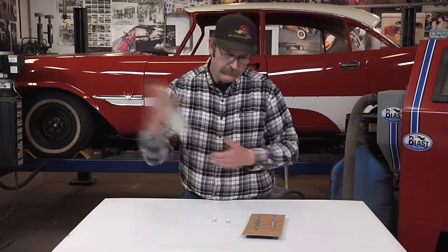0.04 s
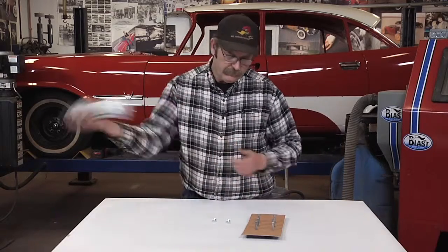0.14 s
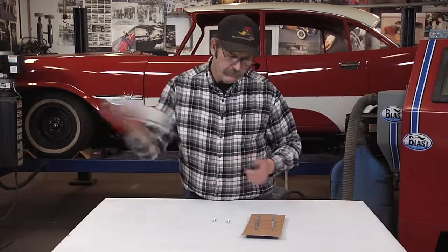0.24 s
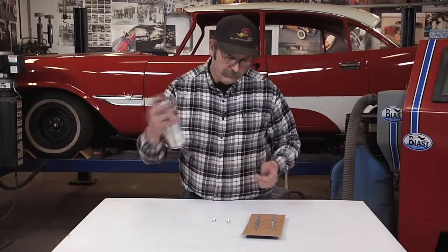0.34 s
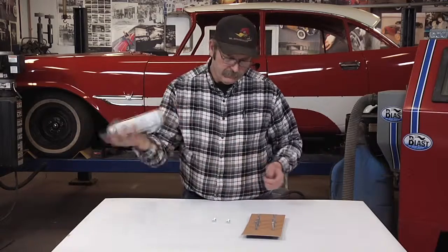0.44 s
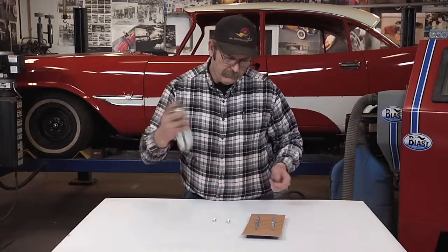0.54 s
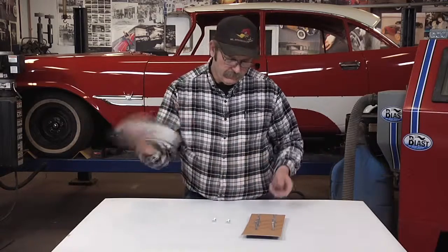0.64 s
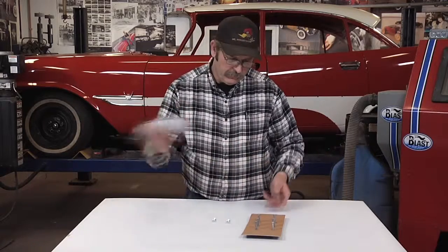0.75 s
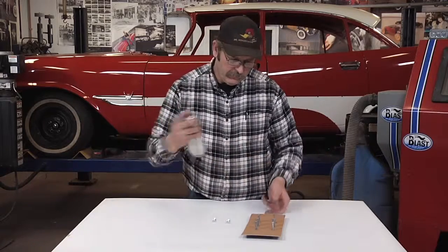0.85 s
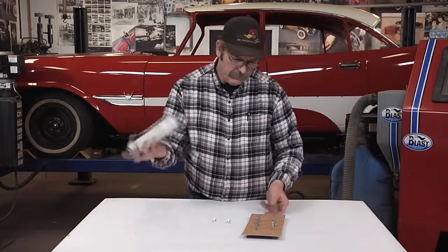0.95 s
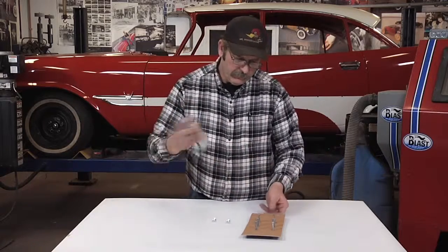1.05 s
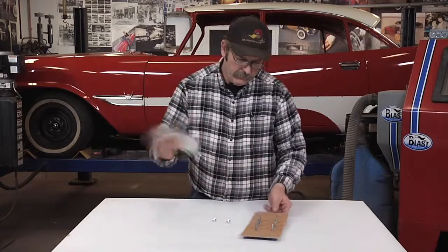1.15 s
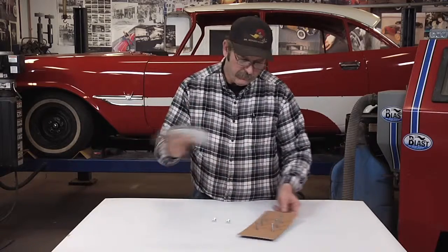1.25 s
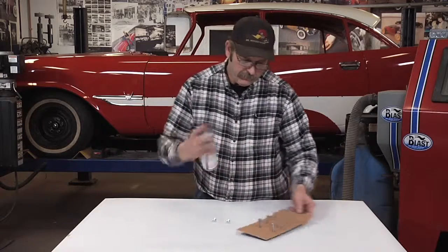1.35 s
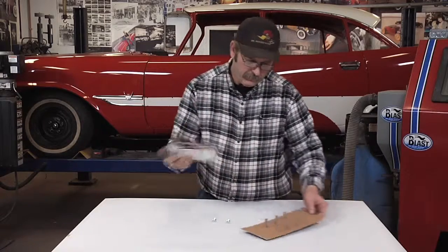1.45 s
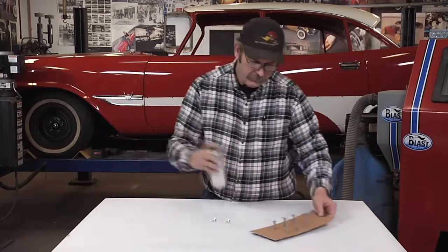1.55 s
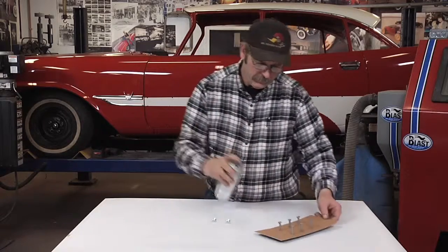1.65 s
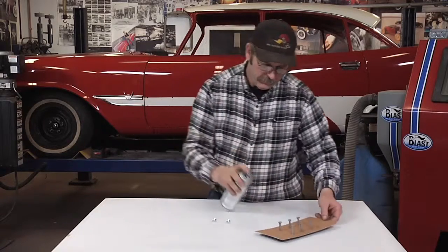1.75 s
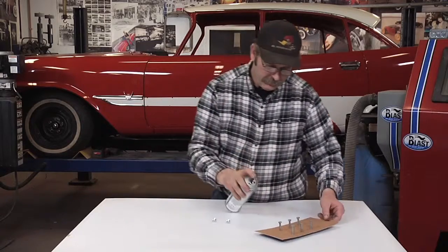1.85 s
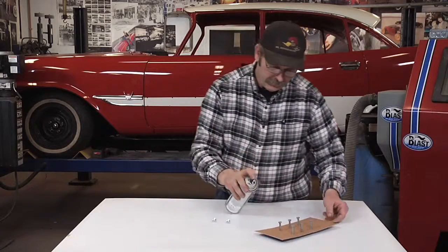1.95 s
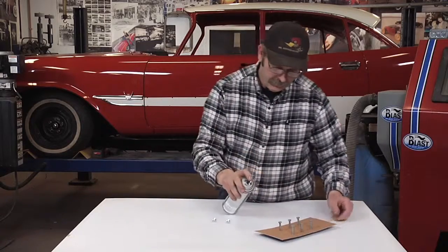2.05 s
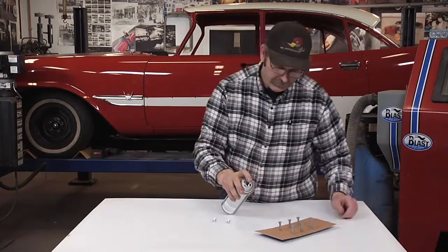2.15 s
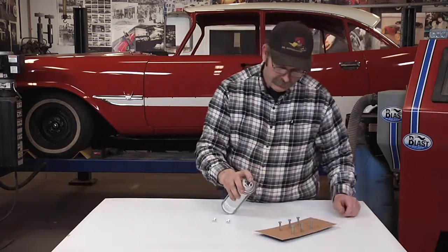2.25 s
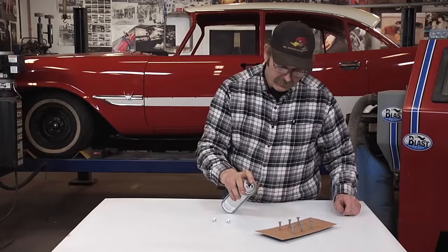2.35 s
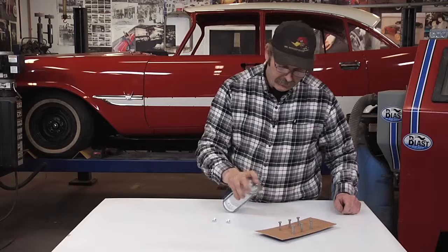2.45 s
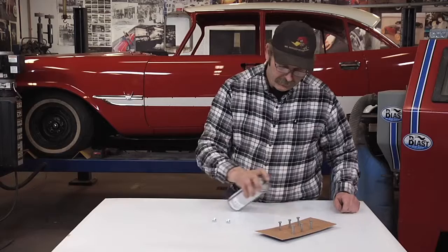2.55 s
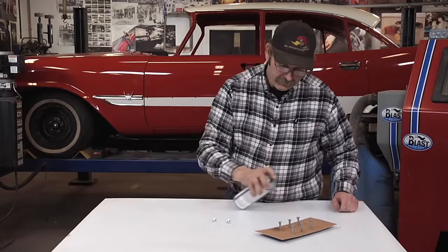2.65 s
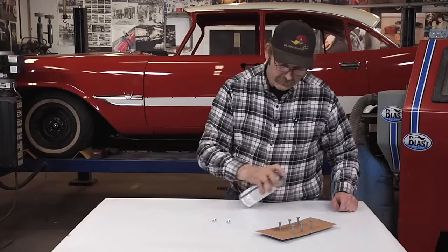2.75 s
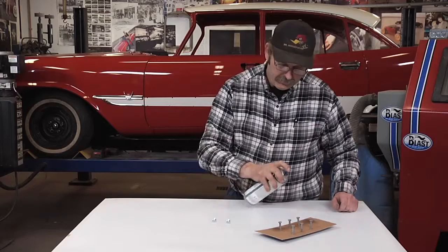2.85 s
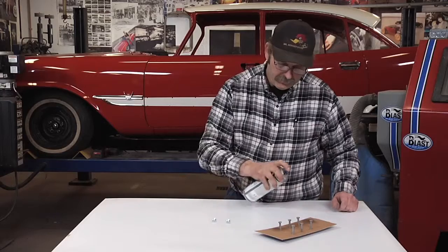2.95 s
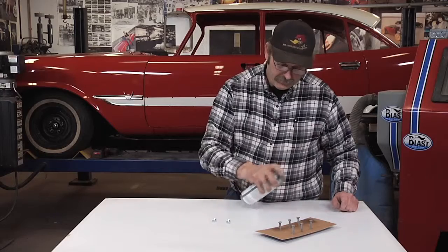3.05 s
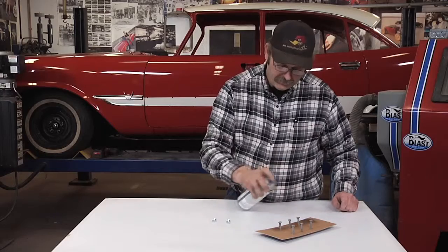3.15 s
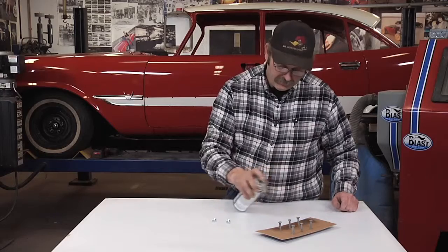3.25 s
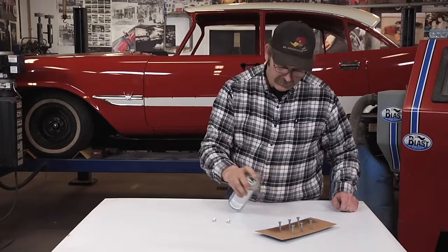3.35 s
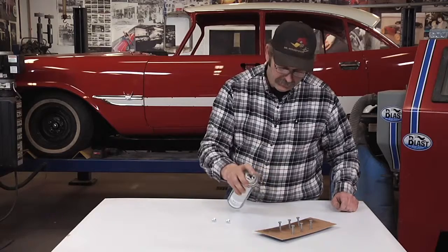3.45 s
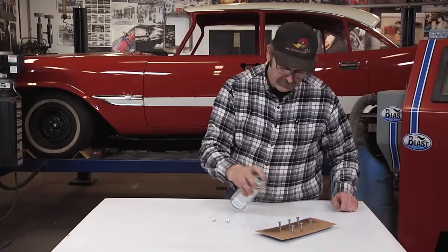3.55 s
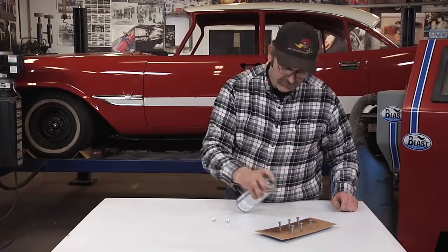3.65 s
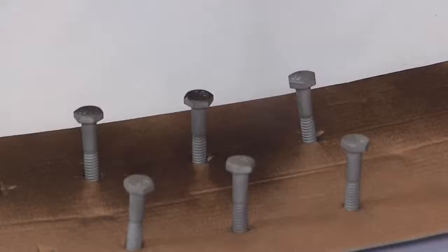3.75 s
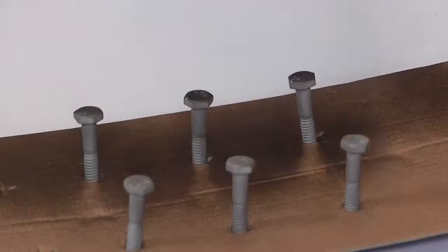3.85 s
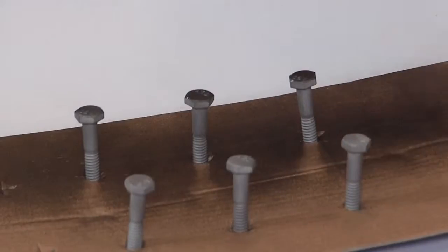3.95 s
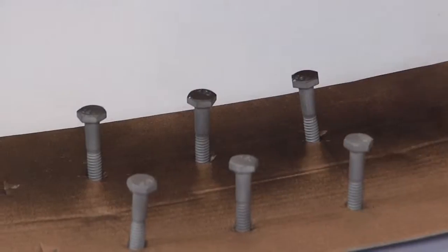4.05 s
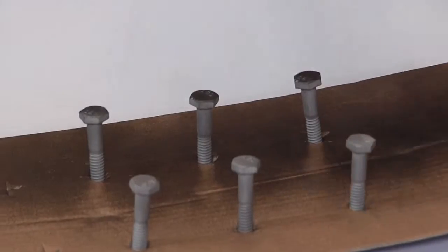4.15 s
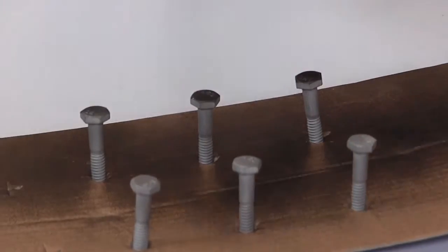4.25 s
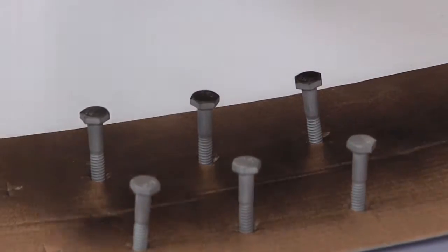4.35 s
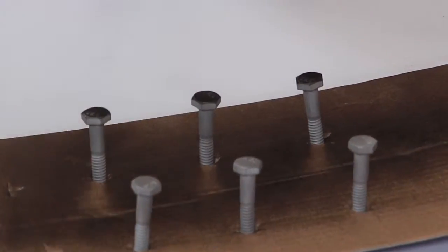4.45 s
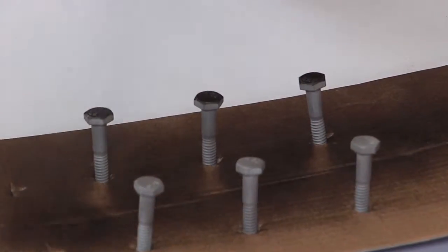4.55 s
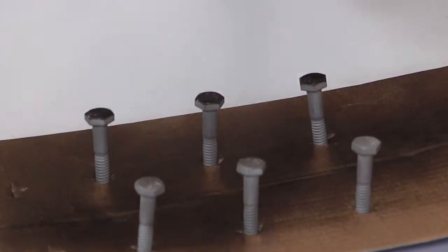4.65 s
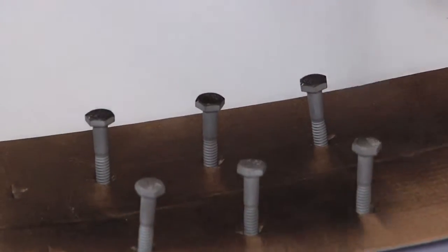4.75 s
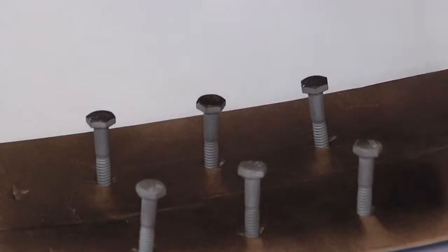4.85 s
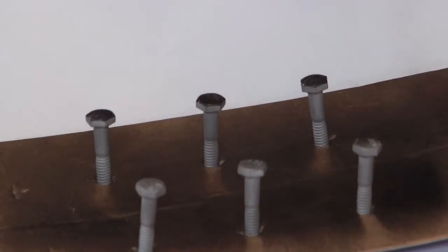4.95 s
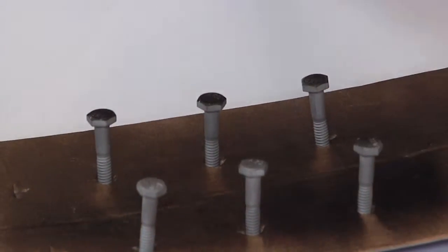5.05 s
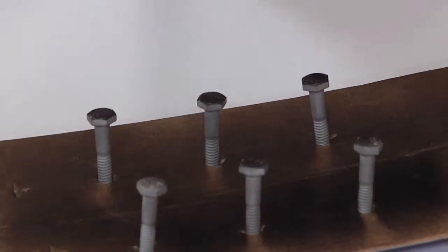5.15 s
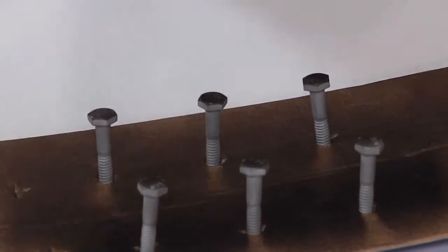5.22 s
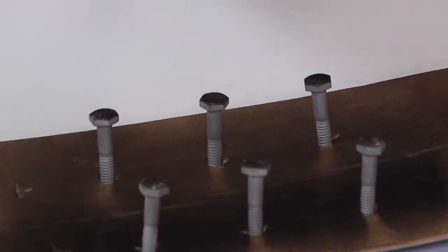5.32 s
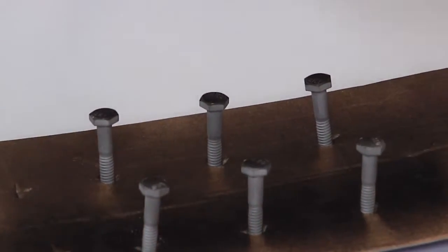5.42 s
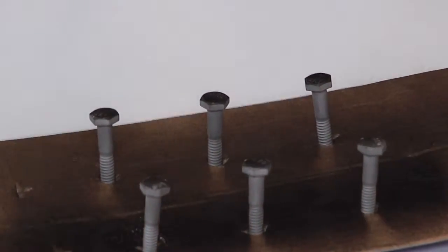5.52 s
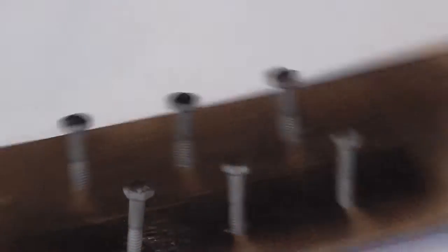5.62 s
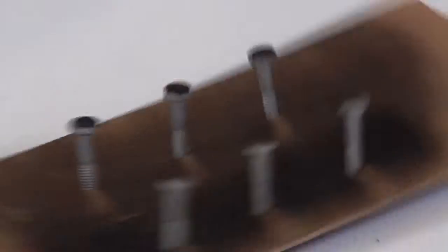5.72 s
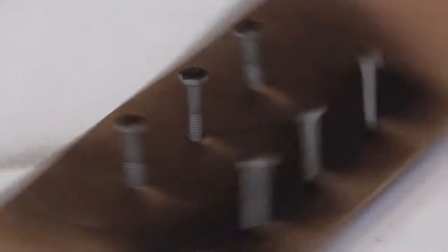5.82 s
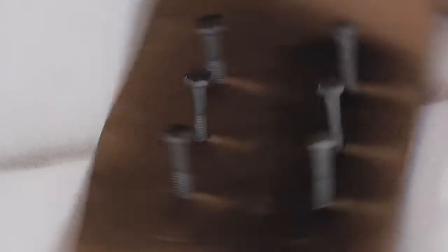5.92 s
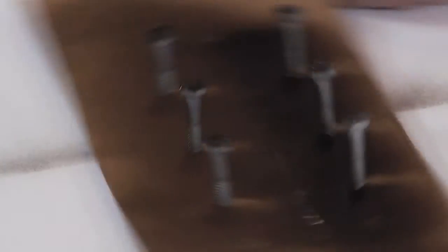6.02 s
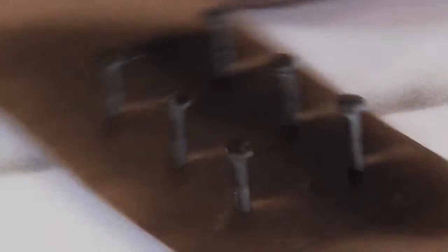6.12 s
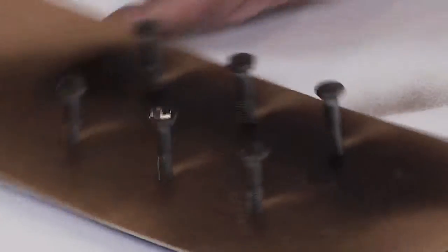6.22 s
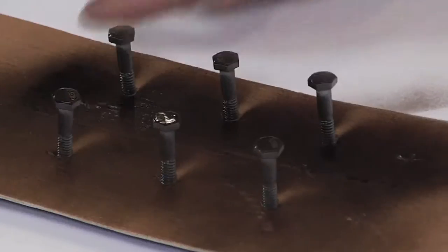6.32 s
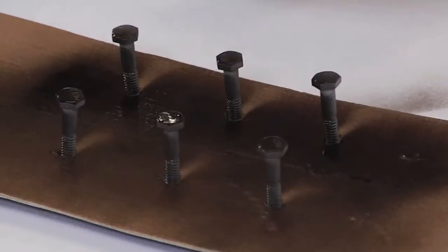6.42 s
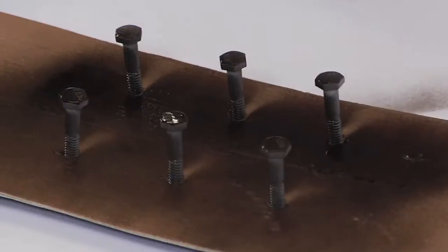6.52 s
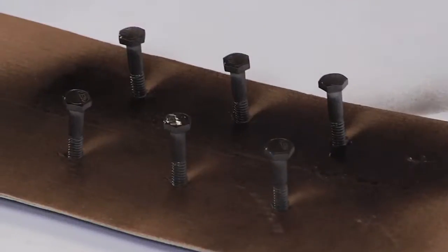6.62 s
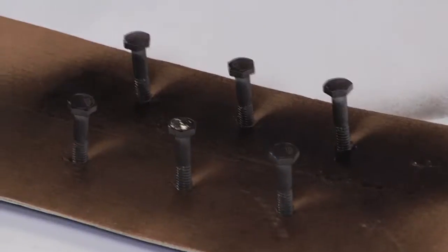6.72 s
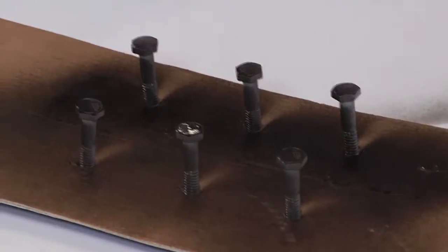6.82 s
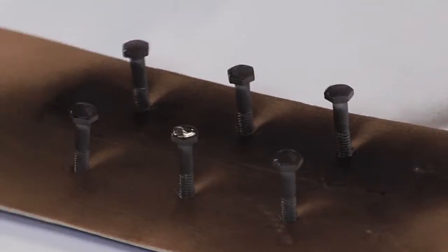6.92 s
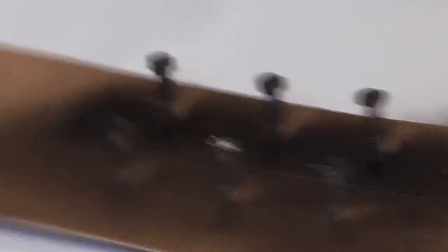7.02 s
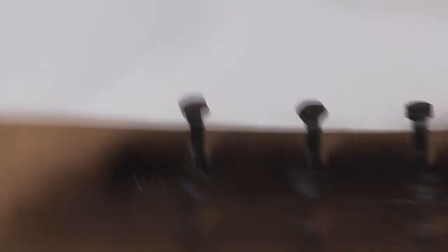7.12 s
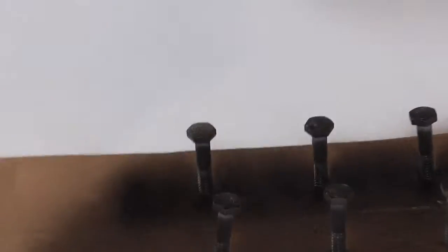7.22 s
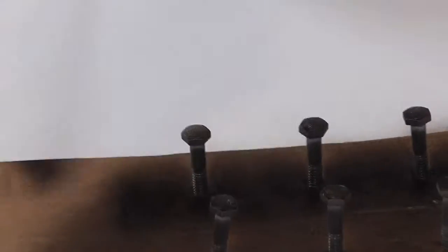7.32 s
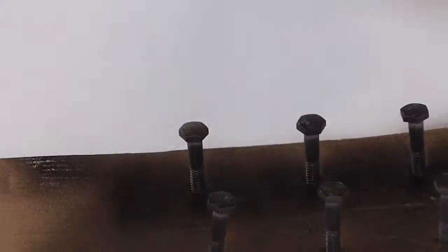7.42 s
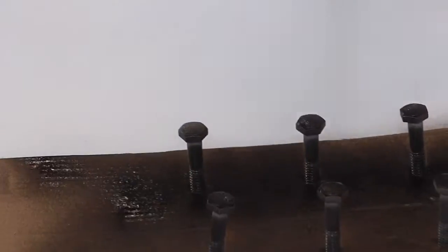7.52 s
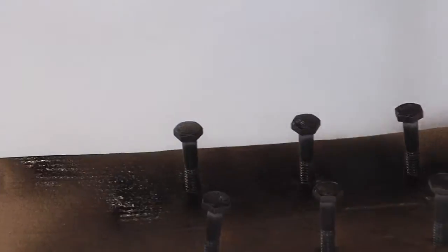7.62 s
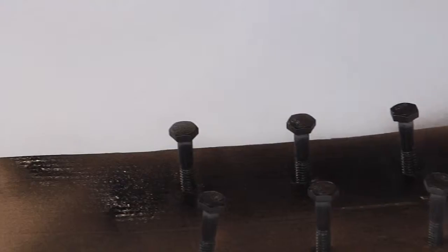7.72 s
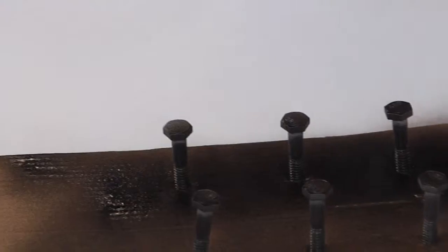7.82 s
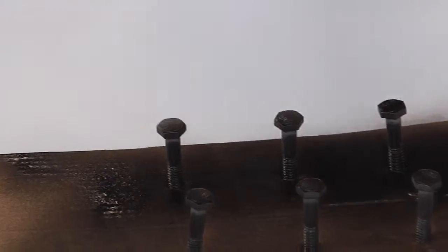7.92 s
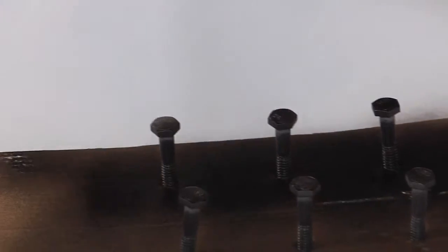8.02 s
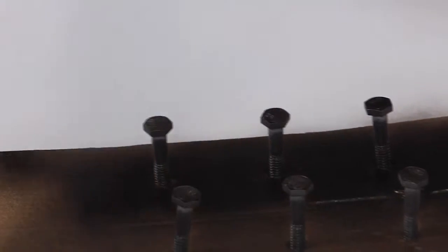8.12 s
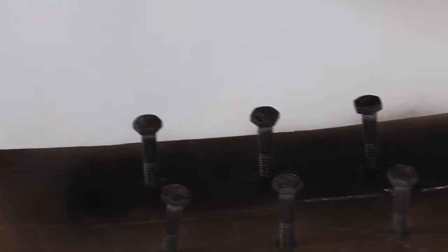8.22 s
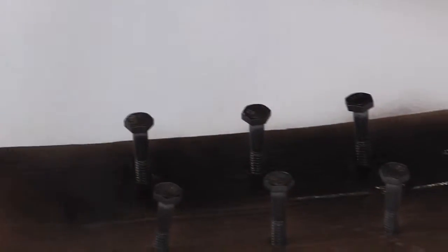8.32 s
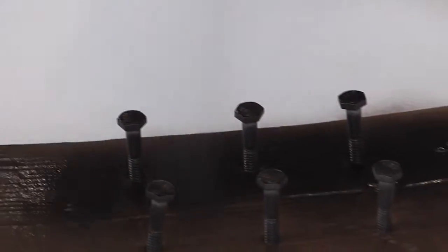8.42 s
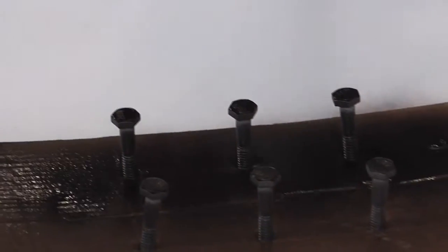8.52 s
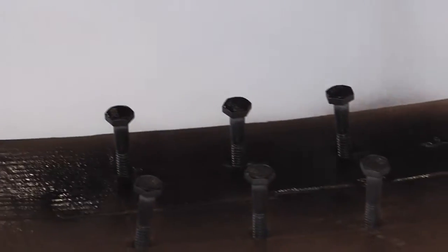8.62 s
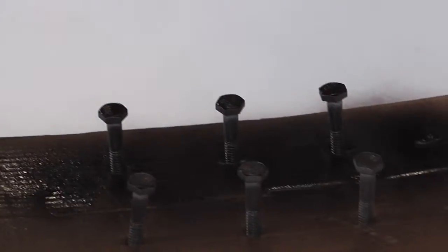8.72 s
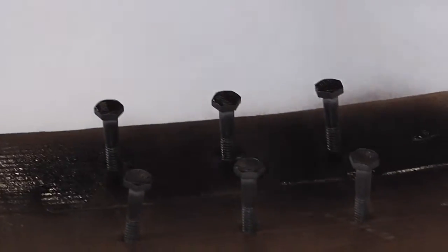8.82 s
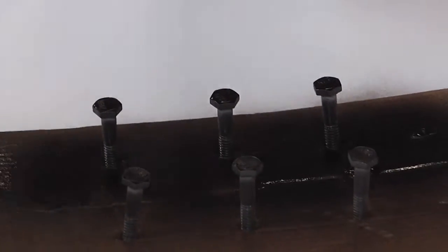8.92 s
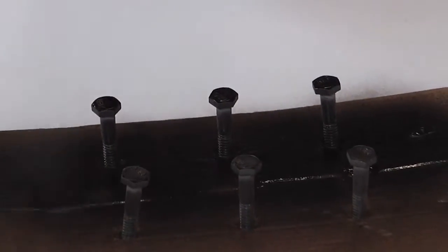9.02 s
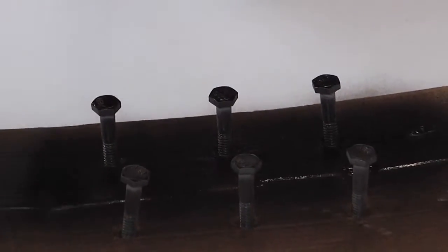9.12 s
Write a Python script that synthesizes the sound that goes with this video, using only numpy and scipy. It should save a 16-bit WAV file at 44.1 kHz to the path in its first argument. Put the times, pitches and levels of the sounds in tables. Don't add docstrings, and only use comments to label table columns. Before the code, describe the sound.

Rapid metallic rattling of a paint can gives way to six short sprays, a dragged cardboard sheet with table knocks, then four more sprays.

```python
import sys
import numpy as np
from scipy import signal
from scipy.io import wavfile
from scipy.ndimage import uniform_filter1d

SR = 44100
rng = np.random.default_rng(int(sys.argv[2]) if len(sys.argv) > 2 else 0)


def how_loud(loudness_db):
    steps = np.asarray(loudness_db, float) / 20
    return 10 ** steps


def to_wav(s):
    ch = np.atleast_2d(s).T
    pcm = np.round(np.clip(ch, -1, 1) * 32767)
    wavfile.write(sys.argv[1], SR, pcm.astype(np.int16))


N = 404397
TIME = np.arange(N) / SR

# frequency in Hz, density in dB per Hz.
AIR_SPECTRUM = [(15, -48), (25, 1), (117, -3.5), (200, -9.5), (277, -10.5), (659, -19), (754, -18.5),
                (1190, -27), (3000, -30.5), (16000, -40)]
# time in seconds, low brush in dB, dry rustle in dB.
SLEEVE_RUBS = [
    [(0.0, -67, -56.5), (0.242, -77, -75.5), (0.27, -89, -75)],
    [(1.95, -70, -65), (2.58, -72, -71), (2.64, -79, -64)],
]
# time in seconds, level in dB, high mode in Hz,
# low mode in dB below, crack in dB below.
TOP_HITS = [(0.3425, -17, 2840, -11, -6.5), (0.3582, -28, 2460, -5, -5.5), (0.4101, -32.5, 4940, -5, -10.5),
            (0.4198, -37, 4700, -5.5, 1), (0.6228, -15.5, 4570, -13, -21), (0.6291, -26.5, 2880, -5, 0),
            (0.6652, -21.5, 4380, -20, -15), (0.8557, -20.5, 4080, -12, -7),
            (0.8647, -24.5, 4070, 1.5, -29.5), (0.8745, -29, 4530, -6, 1),
            (0.882, -34.5, 2340, -2.5, -11.5), (1.1186, -13.5, 2580, -8, -4), (1.1329, -22.5, 2650, -3, -3),
            (1.1547, -22.5, 2460, -11.5, -3.5), (1.1796, -26, 2600, -11, -5.5),
            (1.3548, -21.5, 2780, -11, -8), (1.3654, -20.5, 4250, -4, -11), (1.378, -30.5, 2750, -4.5, -22),
            (1.391, -30, 3850, -1, -29), (1.6128, -15.5, 4160, -14, -28), (1.63, -22, 6440, -5.5, -4),
            (1.642, -29, 2770, -0.5, -22.5), (1.6485, -39.5, 3940, -6, 4), (1.8484, -32, 3770, -7.5, -4)]
# time in seconds, level in dB, low mode in Hz,
# high mode in dB below, crack in dB below.
BASE_HITS = [(0.316, -41.5, 1816, -2.5, -15.5), (0.3362, -33, 1840, -12, -16),
             (0.5275, -28.5, 1980, -6, -7), (0.5932, -36.5, 1630, -5, -6), (0.618, -33.5, 1700, -9.5, -1),
             (0.6718, -28.5, 1910, -10, -3), (0.738, -25.5, 1890, -2, 2), (0.742, -23, 1725, -12.5, -17),
             (0.951, -27.5, 790, -5.5, -15.5), (0.961, -31, 1410, -7, -17), (0.971, -21, 1710, -5.5, -4),
             (1.0077, -34, 1110, -5, -10), (1.089, -26, 1010, -10.5, -14), (1.197, -30.5, 1560, -1.5, -2.5),
             (1.2191, -35.5, 1780, -2, -20), (1.2646, -29, 790, -3.5, 1),
             (1.2752, -30.5, 1520, -6.5, -26.5), (1.3216, -32.5, 800, -7.5, -7.5),
             (1.398, -33.5, 1700, -8.5, 0.5), (1.4725, -25.5, 1660, -3, -2.5),
             (1.5, -30.5, 1480, -5.5, -28), (1.539, -32, 1420, -5.5, -9.5), (1.6711, -34, 1410, -4, -5),
             (1.9902, -42, 1960, -2.5, -1.5)]
# time in seconds, level in dB, low mode in Hz, crack in dB below.
WALL_TAPS = [(0.281, -43.5, 1750, -6), (0.2922, -41, 1740, -9.5), (0.303, -45, 1060, -1),
             (0.5706, -36.5, 1450, -5), (0.6916, -33.5, 890, -8), (0.709, -42, 1720, -17),
             (0.801, -33, 1898, -12.5), (0.8235, -35.5, 990, -15), (1.046, -41, 2020, -10),
             (1.3733, -33, 1930, -3), (1.4302, -33, 950, -13), (1.4394, -34.5, 805, -11),
             (1.45, -33, 1300, -12), (1.572, -37, 1240, -28), (1.5985, -33, 1180, -8),
             (1.6078, -39, 1420, -7), (1.6577, -31.5, 1537, -18), (1.682, -35.5, 910, -24),
             (1.6883, -41, 1300, -16), (1.709, -43, 1280, -9), (1.719, -47, 820, -6),
             (1.8509, -28, 1320, -13), (1.9258, -30, 1340, -50), (1.951, -31, 1510, -13.5),
             (2.0095, -38.5, 1510, -21), (2.07, -42, 1380, -15), (2.112, -48.5, 1540, -13),
             (2.134, -48.5, 1600, -16), (2.149, -52, 1570, -7), (2.227, -57, 1410, -8),
             (1.352, -39, 1820, 0), (.382, -46, 710, -20), (0.8306, -40, 950, -18), (2.059, -50, 1900, -12),
             (.6325, -30.5, 1900, 5.5), (.968, -41, 1180, -10), (1.4453, -37, 800, -7),
             (1.143, -35, 2190, -3)]
# other main mode in Hz, low
# neighbour in Hz and dB, high neighbour in Hz and dB.
TOP_MODES = [(1700.0, 1290.0, -4.0, 5200.0, -2.0), (1780.0, 2070.0, -3.0, 5250.0, -2.0),
             (2010.0, 1560.0, -7.0, 4520.0, -2.0), (1710.0, 2110.0, -3.0, 5040.0, 0.0),
             (1910.0, 1290.0, 0.0, 5150.0, -6.0), (1980.0, 1720.0, -2.0, 2530.0, 2.0),
             (2230.0, 1830.0, -5.0, 2840.0, -1.0), (2060.0, 1790.0, -4.0, 3040.0, -8.0),
             (1950.0, 2230.0, -14.0, 4480.0, 3.0), (1790.0, 2120.0, -7.0, 3070.0, -2.0),
             (1830.0, 1220.0, -7.0, 4220.0, 3.0), (2150.0, 1200.0, -4.0, 3330.0, -5.0),
             (1920.0, 1500.0, -3.0, 3390.0, -1.0), (2080.0, 1580.0, -10.0, 3350.0, -8.0),
             (1990.0, 1540.0, -6.0, 6850.0, -7.0), (1880.0, 1390.0, -4.0, 3870.0, -1.0),
             (1850.0, 830.0, -15.0, 4720.0, -4.0), (1950.0, 1670.0, -7.0, 3230.0, -2.0),
             (1950.0, 1480.0, -10.0, 5210.0, 1.0), (1900.0, 1410.0, 0.0, 2660.0, -7.0),
             (1410.0, 1770.0, -2.0, 2710.0, 3.0), (2060.0, 1710.0, -2.0, 2970.0, -5.0),
             (1850.0, 1520.0, 0.0, 2640.0, 2.0), (1640.0, 700.0, 0.0, 2800.0, 0.0)]
BASE_MODES = [(4890.0, 1030.0, -10.0, 5210.0, -3.0), (4940.0, 1010.0, -12.0, 2600.0, -2.0),
              (4270.0, 1510.0, -14.0, 2320.0, -1.0), (3500.0, 1080.0, 1.0, 4110.0, -2.0),
              (2410.0, 1210.0, -6.0, 3380.0, -5.0), (2400.0, 1010.0, -7.0, 3820.0, 0.0),
              (2390.0, 1020.0, -7.0, 3300.0, -3.0), (2290.0, 1000.0, -15.0, 5140.0, -2.0),
              (2840.0, 1270.0, -4.0, 4950.0, -3.0), (4830.0, 860.0, -2.0, 4290.0, -4.0),
              (2470.0, 850.0, -12.0, 5770.0, -3.0), (5020.0, 1780.0, -3.0, 4500.0, 0.0),
              (3370.0, 2050.0, -5.0, 2480.0, -1.0), (2640.0, 2210.0, -4.0, 3900.0, -2.0),
              (2930.0, 740.0, -1.0, 4900.0, -1.0), (2350.0, 1650.0, 0.0, 5460.0, -7.0),
              (2400.0, 2100.0, 3.0, 5170.0, -8.0), (2700.0, 1510.0, -1.0, 3400.0, -7.0),
              (4030.0, 2140.0, -7.0, 5220.0, -1.0), (2320.0, 1210.0, -2.0, 2730.0, -4.0),
              (2850.0, 1990.0, -4.0, 2540.0, -7.0), (2460.0, 2150.0, -7.0, 4710.0, -9.0),
              (4750.0, 1000.0, -6.0, 5710.0, -3.0), (3560.0, 1630.0, -1.0, 3880.0, -2.0)]
WALL_MODES = [(2820.0, 1200.0, -7.0, 5190.0, 0.0), (4940.0, 660.0, -20.0, 7790.0, 0.0),
              (7680.0, 1810.0, 3.0, 7270.0, -2.0), (3310.0, 2010.0, 0.0, 4900.0, -1.0),
              (2900.0, 1950.0, -6.0, 4040.0, -3.0), (2770.0, 640.0, -1.0, 5250.0, -3.0),
              (2890.0, 1270.0, -9.0, 3450.0, -2.0), (3100.0, 2050.0, -7.0, 3620.0, -1.0),
              (2630.0, 1520.0, -4.0, 2990.0, -2.0), (4510.0, 760.0, -9.0, 3770.0, 0.0),
              (3800.0, 1960.0, -3.0, 5160.0, -3.0), (2520.0, 1710.0, 0.0, 4610.0, -6.0),
              (2630.0, 1600.0, -8.0, 2270.0, -2.0), (2410.0, 1680.0, -9.0, 3830.0, -6.0),
              (5100.0, 1600.0, -9.0, 4770.0, -4.0), (3970.0, 840.0, -15, 2330.0, -1.0),
              (4440.0, 960.0, -14.0, 2330.0, -1.0), (2720.0, 1640.0, -3.0, 4710.0, -1.0),
              (2780.0, 980.0, 1.0, 2330.0, -1.0), (2300.0, 1840.0, -4.0, 4030.0, -1.0),
              (2690.0, 1500.0, 3.0, 4210.0, -2.0), (2310.0, 1870.0, -12.0, 3370.0, 0.0),
              (2380.0, 1120.0, -2.0, 3420.0, -2.0), (2470.0, 1210.0, -8.0, 6000.0, -7.0),
              (5020.0, 1800.0, -2.0, 2300.0, -2.0), (3820.0, 2050.0, -7.0, 5040.0, -2.0),
              (3610.0, 1150.0, -1.0, 5610.0, -6.0), (2390.0, 1270.0, -4.0, 3490.0, -1.0),
              (3410.0, 1910.0, -7.0, 2330.0, -3.0), (3900.0, 610.0, -10.0, 6780.0, -1.0),
              (2977, 2100, 2, 4100, -2.5), (2600, 770, -7, 3400, 0.5), (2600, 1300, -8, 3600, -6),
                   (3500, 1500, -3, 5000, -3), (3170, 1500, -2.5, 6300, 7.5), (2424, 850, -1.5, 4500, -0.5),
                   (2400, 1500, 5.5, 4800, -3.5), (3000, 1300, -3.5, 3300, -8)]
SWELL_S = (0.00049, 0.0006, 0.00076)
# time in seconds, gurgle peak in dB, splash in dB above.
SURGES = [(0.3, -65, -8), (0.39, -39.5, 5), (0.57, -43.5, -9), (0.65, -42, 4.5), (0.8, -48, 6.5),
          (0.9, -42.5, 6.5), (1.02, -49.5, -13), (1.165, -40.5, 5), (1.3, -41, -11), (1.42, -41, -5.5),
          (1.531, -43, -10.5), (1.68, -46.5, 8), (1.88, -57, 1), (2.08, -58, -9)]
# valve opens in seconds, valve half shut in seconds, jet in dB,
# extra echo delay in ms at opening, the same at shutting.
SPURTS = [
    (2.6373, 2.986, -45.5, -.062, .095),
    (3.1097, 3.545, -46, .135, .022),
    (3.6289, 4.071, -46.5, .055, .045),
    (4.1609, 4.547, -47.5, .075, .017),
    (4.6074, 4.982, -47.5, .012, .009),
    (5.0718, 5.439, -47, .05, .035),
    (7.3768, 7.86, -46, -.032, .085),
    (7.917, 8.329, -46, .08, .033),
    (8.4001, 8.799, -46, .045, .002),
    (8.8786, 9.2, -47, .04, -.012),
]
# frequency in Hz, density in dB per Hz.
JET_SPECTRUM = [(180, -36), (300, -13.5), (911, -7), (1190, -5), (1830, -2), (2050, -9), (2340, -6.5),
                (2700, -6.5), (3490, -4.5), (7350, -2.5), (8970, 5), (11500, 0), (15000, 4.5), (16000, -4)]
# delays in ms from table, sheet, can, chest.
ECHOES_MS = [(.59, .273, .735, .405), (.532, .63, .495, .19), (.526, .803, .21, .62),
             (.505, .613, .4, .295), (.497, .598, .225, .383), (.463, .565, .396, .625),
             (.485, .588, .29, .39), (.546, .376, .704, .484), (.556, .37, .565, .225),
             (.518, .627, .395, .3)]
ECHO_SHARES = [(-0.25, -0.15, -0.13, -0.12), (-0.17, 0.16, 0.18, 0.18), (-0.21, -0.14, 0.17, 0.15),
               (-0.24, 0.21, -0.18, -0.14), (-0.32, 0.17, 0.18, -0.21), (-0.25, 0.18, -0.17, -0.13),
               (-0.23, 0.15, -0.16, -0.18), (-0.24, -0.22, -0.15, -0.14), (-0.49, -0.18, 0.4, 0.17),
               (-0.35, 0.17, -0.22, -0.17)]
# time in seconds, peak in dB.
SPUTTERS = [(3.12, -54), (4.172, -57), (4.91, -52.5), (5.083, -58)]
# time in seconds, peak in dB, slap in Hz, table boom in dB above.
KNOCKS = [
    (3.8472, -37, 1050, 0),
    (4.831, -52, 330, 0),
    (6.607, -53, 400, 2),
    (6.631, -54, 400, 0),
    (6.7275, -50, 1450, -25),
    (6.729, -53, 1130, -25),
    (6.752, -57, 1150, -20),
    (7.1308, -39.5, 1100, -5),
    (7.3688, -37, 1250, -2),
    (7.6117, -45, 900, 4),
]
# frequency in Hz, level in dB, t60 in seconds.
TABLE_MODES = [(208.4, -5, 0.14), (313, 8, 0.03), (437, -5, 0.21), (483, -0.5, 0.17), (603, 2, 0.044)]
# time in seconds, peak in dB, pitch in Hz.
TICKS = [(5.75, -54, 9000), (5.882, -44.5, 5500), (6.244, -48, 11470), (6.317, -52.5, 7000),
         (6.598, -59.5, 7680), (6.8933, -47, 5380), (7.1143, -52, 3550), (7.3597, -61, 10100)]
# start in seconds, length in seconds, hollow scrape in dB, dry rustle in dB above.
STROKES = [(5.622, 0.046, -72.5, 1), (5.696, 0.063, -60.5, -6), (5.798, 0.049, -69.5, 2),
           (5.87, 0.29, -65.5, 5), (6.181, 0.2, -60.5, -10), (6.396, 0.038, -73, -9),
           (6.738, 0.094, -77.5, 2), (6.91, 0.039, -67.5, 1), (6.997, 0.033, -66.5, -9),
           (7.115, 0.066, -63, -1.5), (7.186, 0.084, -64.5, 3.5), (7.278, 0.12, -69, -0.5)]
# time in seconds, lower mode in Hz, upper mode in Hz.
HOLLOW = [(5.65, 1530, 2130), (5.9, 1630, 2300), (6.05, 1630, 2210), (6.2, 1650, 2010), (6.32, 1660, 1870),
          (6.45, 1530, 1866), (6.95, 1580, 2000), (7.03, 1525, 2020), (7.2, 1625, 2050)]
HOLLOW_WIDTHS_HZ = [400, 280]
# frequency in Hz, t60 in seconds.
SHOP_T60 = [(200, 0.18), (1500, 0.64), (5000, 0.28), (12000, 0.22)]
# time in seconds, peak in dB.
THUMPS = [(0.342, -27.5), (0.6237, -34), (0.739, -34.5), (0.973, -38), (1.122, -30.5), (1.267, -38),
          (1.3555, -39.5), (1.473, -35), (1.614, -29.5), (1.633, -45.5), (1.6413, -43)]


def evened(x):
    return x / np.sqrt(np.mean(x ** 2, axis=-1, keepdims=True) + 1e-20)


def noise():
    return rng.standard_normal(N)


def read(points, hz):
    f, value = np.transpose(points)
    return np.interp(np.log(hz + 1), np.log(f + 1), value)


def add(mix, s, sound):
    part = mix[round(s * SR):][:len(sound)]
    part += sound[:len(part)]


def band(x, lo_hz, hi_hz, order=2):
    sos = signal.butter(order, [lo_hz, hi_hz], "bp", fs=SR, output="sos")
    return evened(signal.sosfilt(sos, x))


def level(rows, column):
    rows = np.array(rows)
    return how_loud(np.interp(TIME, rows[:, 0], rows[:, column], left=-120, right=-120))


def flicker(size, depth_db):
    slow = uniform_filter1d(uniform_filter1d(noise(), size), size)
    return how_loud(depth_db * evened(slow))


def coloured(spectrum, size, paths=lambda hz, t: 1):
    overlap = size * 3 // 4
    hz, t, z = signal.stft(rng.standard_normal(N + size), SR, nperseg=size, noverlap=overlap)
    z = z * how_loud(read(spectrum, hz))[:, None] * paths(hz[:, None], t)
    return evened(signal.istft(z, SR, nperseg=size, noverlap=overlap)[1][:N])


def ring(hz, t, t60, phase=0):
    return np.sin(2 * np.pi * hz * t + phase) * how_loud(-60 * t / t60)


def swell(start, length, db, rise, fall):
    start, length, db = (np.asarray(v)[:, None] for v in (start, length, db))
    t = TIME[::64]
    early_s, late_s = np.maximum(start - t, 0), np.maximum(t - start - length, 0)
    power = how_loud(2 * (db - rise * early_s - fall * late_s))
    return np.interp(TIME, t, np.sqrt(power.sum(0)))


def grains(per_s, spread_db, lo_hz, hi_hz, t60, count=6):
    size = how_loud(spread_db * np.minimum(rng.exponential(1, N), 4)) * (rng.random(N) < per_s / SR)
    kind, t = rng.integers(0, count, N), np.arange(800) / SR
    out = np.zeros(N)
    for k, hz in enumerate(np.geomspace(lo_hz, hi_hz, count)):
        out += signal.oaconvolve(size * (kind == k), ring(hz, t, t60))[:N]
    return out


def glide(x, hz, width_hz):
    turn = np.exp(2j * np.pi * np.cumsum(hz) / SR)
    low_pass = signal.butter(2, width_hz / 2, fs=SR, output="sos")
    return evened((turn * signal.sosfilt(low_pass, x / turn)).real)


def dry_rustle():
    return band(noise() * flicker(size=200, depth_db=1.5), 2800, 14500, order=1)


def quiet_air(level_db=-64.5):
    return how_loud(level_db) * coloured(AIR_SPECTRUM, size=2048) * flicker(size=1500, depth_db=1.1)


def sleeves():
    cloth = band(noise() * flicker(size=120, depth_db=2.5), 900, 2200, order=1)
    rustle = dry_rustle()
    return sum(cloth * level(rows, column=1) + rustle * level(rows, column=2) for rows in SLEEVE_RUBS)


def strikes(tap_high_db=-8.5, tap_high_follow=0.49):
    top_s, top_db, top_hz, top_low, top_crack = np.transpose(TOP_HITS)
    base_s, base_db, base_hz, base_high, base_crack = np.transpose(BASE_HITS)
    tap_s, tap_db, tap_hz, tap_crack = np.transpose(WALL_TAPS)
    a, b, c = (np.transpose(rows) for rows in (TOP_MODES, BASE_MODES, WALL_MODES))
    top_swell, base_swell, tap_swell = (0 * m[0] + s for m, s in zip((a, b, c), SWELL_S))
    tap_high = tap_db + tap_high_db + tap_high_follow * tap_crack
    return np.hstack([
        [top_s, a[0], top_db + top_low, top_hz, top_db, top_db + top_crack, top_swell, *a[1:]],
        [base_s, base_hz, base_db, b[0], base_db + base_high, base_db + base_crack, base_swell, *b[1:]],
        [tap_s, tap_hz, tap_db, c[0], tap_high, tap_db + tap_crack, tap_swell, *c[1:]]])


def ball(low_t60=0.012, high_t60=0.011, crack_t60=0.0062, rise_s=0.00025):
    (s, low_hz, low_db, high_hz, high_db, crack_db, swell_s,
     low2_hz, low2_db, high2_hz, high2_db) = strikes()[..., None]
    t, out = np.arange(1200) / SR, np.zeros((2, N))
    burst = rng.standard_normal((len(s), len(t)))
    low_gain, high_gain = how_loud(low_db + 13.5), how_loud(high_db + 8.0)
    push = -3.5 * low_gain * np.minimum(low_gain, .12) * ring(520, t, 0.0034)
    low_gain = low_gain * (1 - np.exp(-(t / swell_s) ** 2))
    modes = low_gain * (ring(low_hz, t, low_t60) + how_loud(low2_db) * ring(low2_hz, t, low_t60))
    modes += high_gain * (ring(high_hz, t, high_t60) + how_loud(high2_db) * ring(high2_hz, t, high_t60))
    blur = 0.36 * low_gain * band(burst, 390, 1840, order=3) * how_loud(-60 * t / low_t60)
    blur += high_gain * band(burst, 1700, 6100) * how_loud(-60 * t / high_t60)
    blur += how_loud(crack_db + 10.5) * band(burst, 4600, 13000) * how_loud(-60 * t / crack_t60)
    onset = 1 - np.exp(-(t / rise_s) ** 2)
    straight = (modes + blur + push) * onset
    scattered = (modes / 4 + 1.32 * blur) * onset
    for at, near, far in zip(s[:, 0], straight, scattered):
        add(out[0], at, near)
        add(out[1], at, far)
    return out


def paint(rise_db_per_s=228, gurgle_fall_db_per_s=134.5, splash_fall_db_per_s=80):
    s, db, splash_db = np.transpose(SURGES)
    gurgle_gain = swell(s, 0 * s, db, rise_db_per_s, gurgle_fall_db_per_s)
    splash_gain = swell(s, 0 * s, db + splash_db, rise_db_per_s, splash_fall_db_per_s)
    lumps = flicker(size=60, depth_db=2.5)
    gurgle = band(noise(), 790, 2200) * gurgle_gain
    splash = band(noise(), 1900, 5400) * splash_gain
    rebounds = evened(grains(per_s=480, spread_db=3, lo_hz=1300, hi_hz=4700, t60=0.0043))
    chatter = rebounds * gurgle_gain * how_loud(0.5)
    return how_loud(-10.0) * (lumps * (gurgle + splash) + chatter)


def bounced(hz, t, strength=1.5, clutter=.16, still_ms=.3, moving_ms=.5):
    def delayed(ms):
        return np.exp(-2j * np.pi * hz * ms / 1000)

    spurt = np.clip(np.searchsorted(np.transpose(SPURTS)[0], t) - 1, 0, None)
    on, off, _, first, last = np.transpose(SPURTS)[:, spurt]
    sweep = np.clip(2 * (t - on) / (off - on) - 1, -1, 1)
    slide = (last - first) / 2 * sweep + (last + first) / 2 * sweep ** 2
    ms = np.transpose(ECHOES_MS)[:, spurt]
    ms = ms + slide * np.clip((ms - still_ms) / (moving_ms - still_ms), 0, 1)
    mirror = np.clip(hz / 9000, .5, 1)
    shares = np.transpose(ECHO_SHARES)[:, spurt]
    paths = 1 + strength * mirror * sum(share * delayed(d) for d, share in zip(ms, shares))
    paths -= .2 * np.clip(9500 / (hz + 1) - 1, 0, 1) * delayed(1.27 + slide / 2)
    for factor in np.geomspace(1.35, 4.5, 12):
        seen = np.interp(t, np.arange(0, 10, .12), rng.standard_normal(84))
        paths += clutter * seen * mirror * delayed(factor * ms[0])
    return paths


def spray(open_s=.011, crack=.3, shut_s=.015, leak_t60=.45, spit_hz=3930):
    jet = coloured(JET_SPECTRUM, size=512, paths=bounced)
    jet = jet * flicker(size=40, depth_db=0.78) * flicker(size=900, depth_db=0.62)
    valve, leak, spit = np.zeros((3, N))
    for on, off, db, *_ in SPURTS:
        corners_s = [on, on + open_s / 10, on + open_s, off - shut_s, off + shut_s]
        valve += how_loud(db) * np.interp(TIME, corners_s, [0, crack, 1, 1, 0])
        leak += how_loud(db - 15 - 60 * abs(TIME - off) / leak_t60) * (TIME > off)
    for s, db in SPUTTERS:
        spit += how_loud(db) * np.exp(-((TIME - s) / 0.0095) ** 2)
    spit = spit * band(noise(), spit_hz / 1.14, spit_hz * 1.14, order=1)
    for on, _, db, *_ in SPURTS:
        add(spit, on, how_loud(db - 10.5) * ring(1900, TIME[:400], 0.0085))
    return spit + jet * valve + band(noise(), 6100, 22000) * leak


def knocks():
    out, t = np.zeros(N), np.arange(6000) / SR
    for s, db, hz, boom_db in KNOCKS:
        slap_t60, slap_gain = (0.0055, 1) if boom_db > -15 else (0.04, .4)
        add(out, s, -how_loud(db) * slap_gain * ring(hz, t, slap_t60))
        boom = sum(how_loud(d) * ring(f * rng.uniform(0.94, 1.03), t, t60) for f, d, t60 in TABLE_MODES)
        add(out, s + .001, how_loud(db + boom_db - 11) * boom * (1 - np.exp(-t / 0.0017)))
        rumble = band(rng.standard_normal(len(t)), 250, 850, order=3) * how_loud(-60 * t / 0.35)
        add(out, s, how_loud(db + boom_db - 20) * rumble)
    return out


def grit(start_s=5.2, end_s=8.9):
    crackle = grains(per_s=60, spread_db=2.7, lo_hz=4100, hi_hz=14700, t60=0.0064)
    out = how_loud(-70) * crackle * (TIME > start_s) * (TIME < end_s)
    t = np.arange(6000) / SR
    for s, db, hz in TICKS:
        tick = band(rng.standard_normal(len(t)), hz / 1.2, hz * 1.4, order=1) * how_loud(-60 * t / 0.027)
        add(out, s, how_loud(db - 7.5) * tick)
    return out


def dragged_sheet(rise_db_per_s=386, fall_db_per_s=382, upper_db=-9.5, lift_s=6.05, lift_span_s=0.14, lift_db=11):
    grain = noise() * flicker(size=120, depth_db=2.5)
    turn_s, *modes_hz = np.transpose(HOLLOW)
    hollow, upper = (glide(grain, np.interp(TIME, turn_s, hz), width)
                     for hz, width in zip(modes_hz, HOLLOW_WIDTHS_HZ))
    faint = sum(band(grain, hz - width / 2, hz + width / 2) for hz, width in ((3600, 640), (10800, 900)))
    rustle = dry_rustle() + how_loud(-11) * faint
    s, length, db, dry_db = np.transpose(STROKES)
    rub, dry = (swell(s, length, d, rise_db_per_s, fall_db_per_s) for d in (db, db + dry_db))
    lifted = how_loud(upper_db + lift_db * np.exp(-((TIME - lift_s) / lift_span_s) ** 2))
    return (hollow + upper * lifted) * rub + rustle * dry


def shop(x, floor_s=0.0095, floor_db=-23, tail_db=-14):
    at, out = np.arange(300, SR - 10, 10), np.zeros(N)
    for turn in range(3):
        taps = np.zeros(SR)
        taps[at + rng.integers(0, 10, len(at))] = rng.choice([-1., 1.], len(at))
        hz, t, z = signal.stft(taps, SR, nperseg=256)
        decay = how_loud(-60 * t / read(SHOP_T60, hz)[:, None])
        tail = signal.istft(z * decay, SR, nperseg=256)[1]
        tail *= np.minimum(np.arange(len(tail)) / 700, 1) ** 2
        tail *= how_loud(tail_db) / np.linalg.norm(tail)
        share = np.sqrt(2 / 3) * np.cos(2 * np.pi * (23 * TIME + turn / 3))
        out += signal.fftconvolve(x * share, tail)[:N]
    add(out, floor_s, how_loud(floor_db) * x)
    return out


def scene():
    air = quiet_air()
    straight, scattered = ball()
    jet = spray()
    rest = sleeves() + paint() + knocks() + grit() + dragged_sheet()
    echoes = shop(scattered + how_loud(-7) * jet + how_loud(-3) * rest)
    mono = straight + jet + rest + echoes + air
    return np.array([mono, mono])


def top_cut(x):
    return signal.sosfilt(signal.butter(12, 16980, fs=SR, output="sos"), x)


def record(dry, ceiling=0.18, thump=0.21, thump_hz=250, coupling_hz=26, bend=3.8, shove_s=0.0015):
    power = thump * ceiling * np.minimum(abs(dry) / ceiling, 1) ** bend
    u = TIME[:800] / shove_s
    for s, db in THUMPS:
        add(power.T, s, (how_loud(db) * u * np.exp(1 - u))[:, None])
    coupling = signal.butter(3, [coupling_hz, thump_hz], "bp", fs=SR, output="sos")
    pushed = dry + signal.sosfilt(coupling, power)
    flat = pushed / (1 + (pushed / ceiling) ** 6) ** (1 / 6)
    edge, shelf = (signal.firwin(1201, hz, window=("kaiser", 9), fs=SR) for hz in (15800, 16650))
    narrow = signal.oaconvolve(flat, (edge + how_loud(-54) * shelf)[None], "same")
    return top_cut(narrow)


dry = scene()
out = record(dry)
to_wav(out)
```